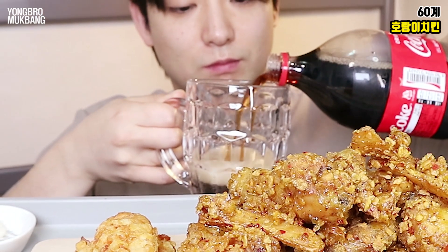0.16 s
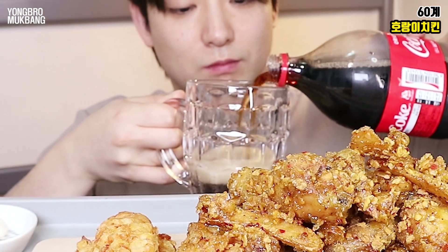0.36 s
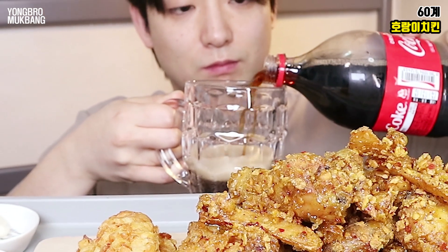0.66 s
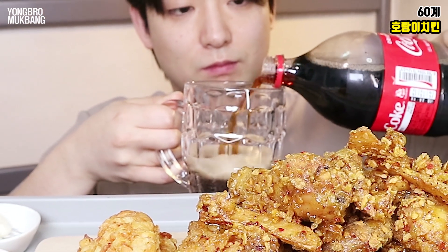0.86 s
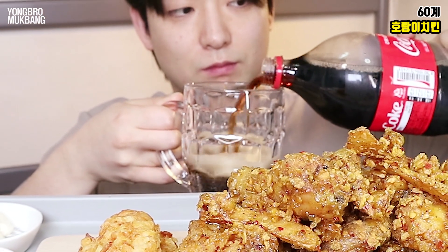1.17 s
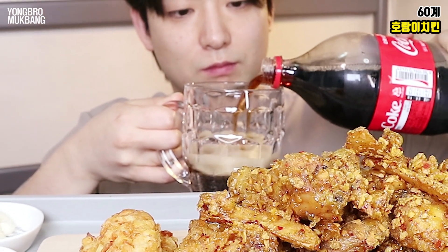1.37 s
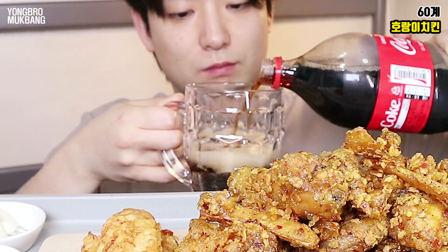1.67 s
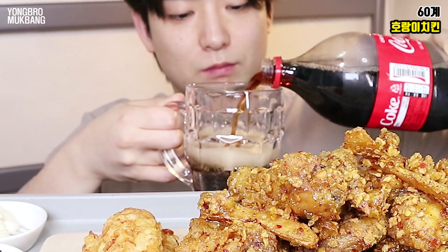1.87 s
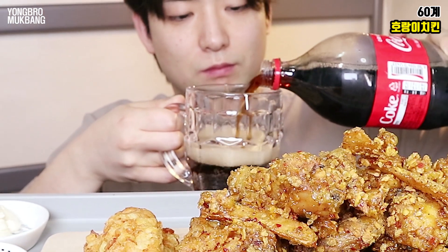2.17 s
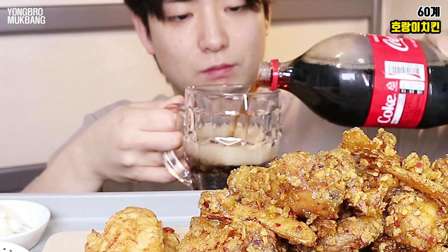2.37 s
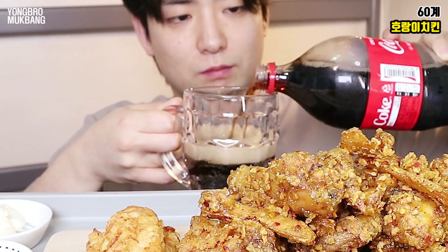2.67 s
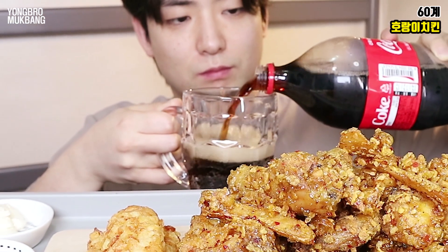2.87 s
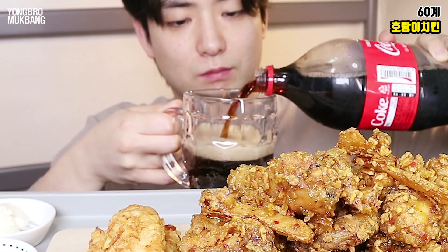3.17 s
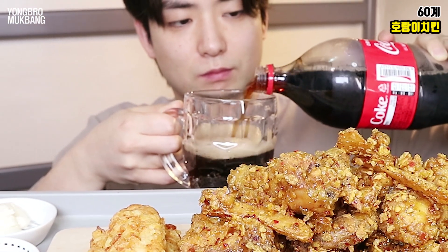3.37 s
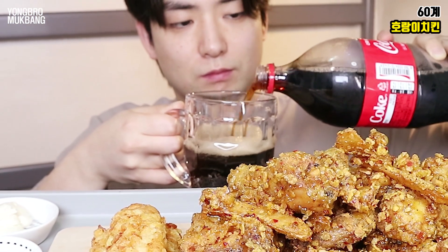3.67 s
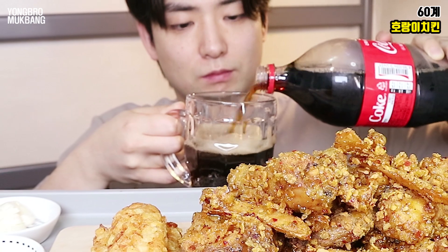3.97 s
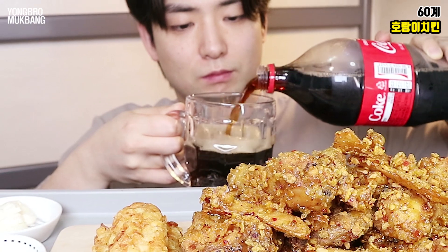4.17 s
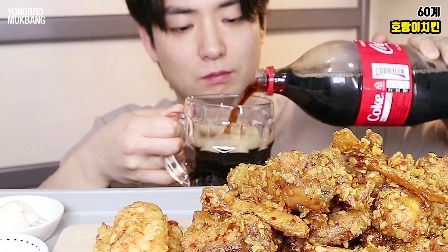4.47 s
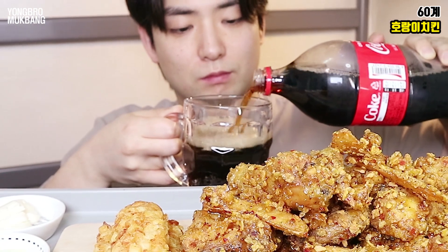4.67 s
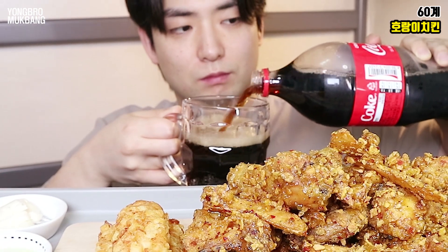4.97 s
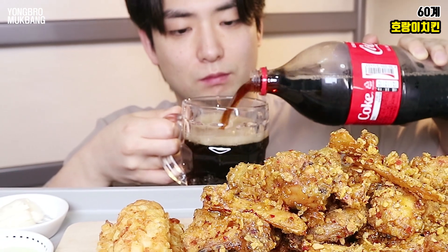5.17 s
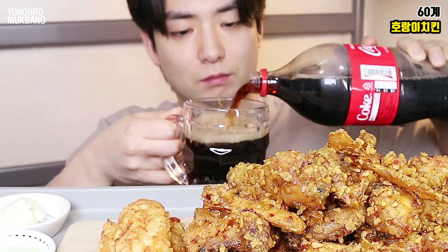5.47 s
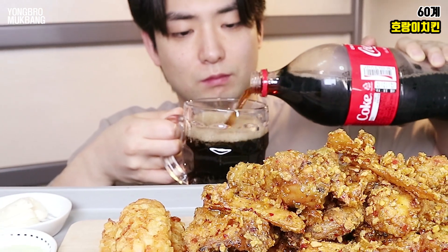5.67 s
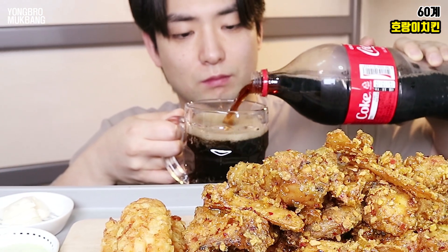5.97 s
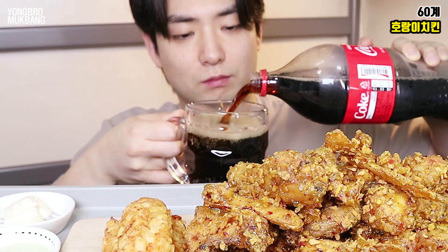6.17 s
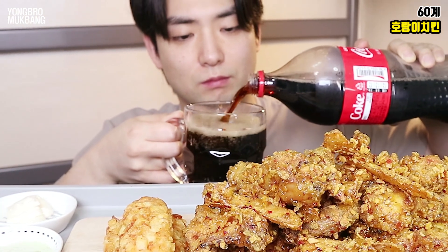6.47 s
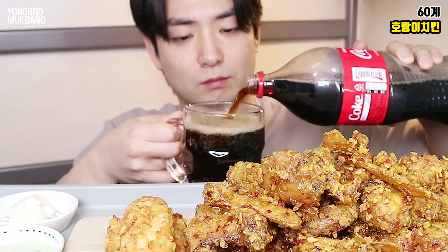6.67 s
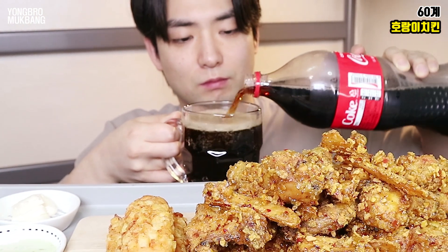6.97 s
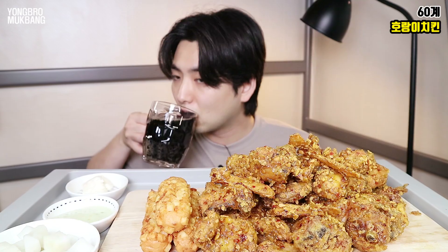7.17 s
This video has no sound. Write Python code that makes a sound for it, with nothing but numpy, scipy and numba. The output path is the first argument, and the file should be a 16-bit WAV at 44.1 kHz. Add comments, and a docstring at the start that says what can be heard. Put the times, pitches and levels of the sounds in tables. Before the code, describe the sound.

A fizzy drink gurgles from a plastic bottle into a glass mug, hollow note rising and thinning as it fills, then stops abruptly with soft knocks.

```python
"""A gurgling pour, close to the microphone: cola runs from a plastic bottle into a glass mug in a small room.
The stream beats bubbles into the drink; they ring the air in the mug, whose note climbs overall as it fills.
Random clicks through resonances make the gurgle, the surface patter and the fizz of the foam.
Damped tones make the single bubbles, the bottle's gulps of air and a few soft knocks of handling, most of
them around the moment the pour breaks off. Filtered noise and a faint hum lie behind it all."""
import sys
import numpy as np
from scipy import signal
from scipy.fft import rfft, irfft
from scipy.io import wavfile
from scipy.ndimage import uniform_filter1d
from numba import njit

SR = 44100
rng = np.random.default_rng(int(sys.argv[2]) if len(sys.argv) > 2 else 0)


def log_audio(samples):
    """Write samples as a 16-bit WAV file to the path given in sys.argv[1]."""
    # one column per channel
    frames = np.atleast_2d(samples).T
    # limit to full scale, then quantise
    limited = np.clip(frames, -1, 1)
    pcm = np.round(limited * 32767).astype(np.int16)
    wavfile.write(sys.argv[1], SR, pcm)


N = 323253
TIME = np.arange(N) / SR
POUR_END_S = 7.175
# fixed low resonances of the mug and its surroundings: pitch_hz, width_hz, lift_db
MUG_MODES = [(690, 60, -3), (810, 80, 3), (970, 70, 7), (1085, 70, -4), (1185, 90, 5), (1460, 130, -4),
             (1610, 50, 5), (1715, 50, 4), (2230, 110, 5), (2500, 250, -5)]


def amp(db):
    """Decibels to gain."""
    return 10 ** (np.asarray(db) / 20)


def unit(x):
    """Scales to rms 1."""
    return x / np.sqrt(np.mean(x ** 2) + 1e-20)


def curve(rows, axis, t=TIME):
    """One column of a table of timed rows, joined by straight lines."""
    rows = np.asarray(rows)
    return np.interp(t, rows[:, 0], rows[:, axis])


def slope(points, hz):
    """A spectrum in dB, joined on a log-frequency axis."""
    f, db = np.transpose(points)
    return np.interp(np.log(hz + 1), np.log(f + 1), db)


def lifts(modes, hz):
    """The dB that a set of resonances adds at each frequency."""
    return sum(db / (1 + (2 * (hz - f) / width) ** 2) for f, width, db in modes)


def add(mix, s, sound):
    """Mixes a sound in at time s."""
    part = mix[max(round(s * SR), 0):][:len(sound)]
    part += sound[:len(part)]


def colour(x, db_at, size=4096):
    """Causal (minimum-phase) filter whose gain in dB is db_at(Hz): it rings only after each click."""
    cepstrum = irfft(np.log(amp(db_at(np.fft.rfftfreq(size, 1 / SR)))))
    # folding the cepstrum forward in time moves all the ringing behind the click
    cepstrum[1:size // 2] *= 2
    cepstrum[size // 2 + 1:] = 0
    response = irfft(np.exp(rfft(cepstrum)))
    return signal.oaconvolve(x, response)[:N]


def steady(x, band, size=4000):
    """Holds the running rms inside a band (Hz) near 1, so that a level curve can play it."""
    bandpass = signal.butter(3, band, "bandpass", fs=SR, output="sos")
    inside = signal.sosfiltfilt(bandpass, x)
    power = uniform_filter1d(uniform_filter1d(inside ** 2, size), size // 2)
    return x / np.sqrt(abs(power) + 1e-20)


def pops(per_s, spread_db, clump_db, size=500):
    """Random clicks of unequal size, whose strength also wanders slowly so that they clump."""
    sizes = amp(spread_db * np.minimum(rng.exponential(1, N), 5)) * rng.choice([-1, 1], N)
    clumps = amp(clump_db * unit(uniform_filter1d(rng.standard_normal(N), size)))
    return unit(sizes * clumps * (rng.random(N) < per_s / SR))


@njit
def smooth(x, r):
    """One-pole low-pass with a moving pole."""
    y = np.zeros_like(x)
    for i in range(1, len(x)):
        y[i] = r[i] * y[i - 1] + (1 - r[i]) * x[i]
    return y


def resonate(x, hz, width):
    """A resonance of gain 1 that follows the curve hz: shift it to zero, low-pass, shift it back."""
    turn = np.exp(2j * np.pi * np.cumsum(hz) / SR)
    pole = np.exp(-np.pi * width / SR)
    return 2 * (turn * smooth(x / turn, pole)).real


def ring(db, hz, decay, rise=0., size=6000):
    """A damped tone that swells over one decay time (s); its pitch may creep up by the share rise per decay."""
    t = np.arange(size) / SR
    age = t / max(decay, 1e-4)
    tone = np.sin(2 * np.pi * hz * t * (1 + rise * np.minimum(age, 10) / 2))
    return amp(db) * age * np.exp(1 - age) * tone


def echoing(clicks, share, decay, count, size=1500):
    """Echoes between the glass walls; their pattern keeps changing as the surface heaves."""
    out, step = np.zeros(N), N // count + 1
    window = np.sin(np.pi * np.arange(2 * step) / (2 * step))
    padded = np.pad(clicks, (step, 3 * step))
    for k in range(count + 2):
        echoes = rng.standard_normal(size) * np.exp(-np.arange(size) / SR / decay)
        echoes *= share / np.linalg.norm(echoes)
        echoes[0] += 1  # the direct sound
        part = signal.fftconvolve(padded[k * step:][:2 * step] * window, echoes)
        add(out, max(k - 1, 0) * step / SR, part[step:] if k == 0 else part)
    return out


def in_mug(clicks, spectrum, patch_db, wander=0.014, rim_db=13.0, size=1024):
    """Clicks ring the high air modes of the filling mug, which shift as the drink rises."""
    # higher air modes: nearly_empty_hz, nearly_full_hz, width_hz, nearly_empty_lift_db, nearly_full_lift_db
    air_modes = [(1550, 1450, 820, -4.5, 3.5), (2380, 2234, 250, 8.5, 8.5), (2737, 2625, 164, 14.5, 12.5),
                 (3130, 2800, 140, -0.5, 8.5), (3141, 3141, 92, 9, 10.5), (5530, 5270, 470, 2.5, 12),
                 (6520, 6190, 330, -3.5, 6), (7240, 7010, 410, 6, 6.5), (7540, 7900, 230, -0.5, 7.5),
                 (7730, 7600, 220, 5, 2), (8370, 8480, 350, 6.5, 10), (9250, 9380, 380, -1.5, 6),
                 (10220, 10050, 400, 8.5, 6), (10700, 10550, 230, 2, 2), (11360, 11080, 350, 10.5, 6),
                 (13100, 12900, 390, 1, 6)]
    hz, t, z = signal.stft(clicks, SR, nperseg=size, noverlap=size * 3 // 4)
    hz = hz[:, None]
    fill = np.clip((t - 1.4) / 3.7, 0, 1)
    # the heaving foam detunes each mode a little
    heave = rng.standard_normal((len(air_modes), len(t)))
    heave = 1 + wander * unit(uniform_filter1d(heave, size=36, axis=1))
    modes = [((f0 + (f1 - f0) * fill) * drift, width, db0 + (db1 - db0) * fill)
             for (f0, f1, width, db0, db1), drift in zip(air_modes, heave)]
    # close to the rim the shallow air gap brightens the splash
    modes.append((2950, 600, rim_db * np.clip((t - 5.6) / 1.6, 0, 1)))
    # the wandering stream favours now one mode, now another
    patches = uniform_filter1d(rng.standard_normal(z.shape), size=5, axis=0)
    patches = unit(uniform_filter1d(patches, size=16, axis=1))
    z = z * amp(slope(spectrum, hz) + lifts(modes, hz) + patch_db * patches)
    return signal.istft(z, nperseg=size, noverlap=size * 3 // 4)[1][:N]


def filled():
    """How full the mug is, 0 to 1."""
    return np.clip(TIME / POUR_END_S, 0, 1)


def building(build_s=0.91, build_db=4.5):
    """The dB (0 or below) by which the stream is still short of its full strength."""
    return -build_db * np.clip(1 - TIME / build_s, 0, 1)


def swell(start, length, peak=0.21):
    """0 to 1 and back: a quick rise to the share peak of the length, then a slower ebb."""
    return np.sin(np.pi / 2 * np.interp((TIME - start) / length, [0, peak, 1], [0, 1, 0]))


def surging():
    """The dB that the gurgle gains where the stream surges and plunges deeper."""
    # surges of the stream: start_s, length_s, gurgle_lift_db
    surges = [(2.66, 0.14, 1.5), (2.922, 0.1, 2.5), (3.882, 0.32, 3.5), (4.57, 0.19, 4.5),
              (4.948, 0.17, 10.5), (5.313, 0.089, 3), (5.464, 0.073, 4), (5.72, 0.13, 4.5),
              (6.24, 0.13, 7.5), (6.335, 0.16, 8.5)]
    return sum(db * swell(start, length) for start, length, db in surges)


def room(level_db=-53):
    """Ventilation as coloured noise, and an appliance's faint hum as steady sines."""
    # relative spectrum of the ventilation: pitch_hz, level_db
    air_tone = [(25, -35), (60, -31), (100, -13), (160, -10), (220, 4.5), (300, 0), (400, 2.5), (500, -3.5),
                (750, -5), (1400, -17), (2200, -15), (4000, -20), (9000, -22), (15700, -32)]
    # appliance hum: pitch_hz, rms_level_db
    hum_tones = [(67.2, -76.5), (341, -63), (568, -67.5)]
    air = unit(colour(rng.standard_normal(N), lambda hz: slope(air_tone, hz)))
    hum = sum(amp(db) * np.sqrt(2) * np.sin(2 * np.pi * (hz * TIME + rng.random()))
              for hz, db in hum_tones)
    return amp(level_db) * air + hum


def knocks(rub_decay=0.05, size=5000):
    """Handling: dull blows as short damped tones, each with a brief rub of fading noise."""
    # soft knocks: start_s, peak_db, pitch_hz, decay_s, rub_level_db (before the rub's tone filter)
    blow_list = [(0.577, -37, 425.4, 0.0036, -74), (3.29, -39, 281, 0.0024, -49),
                 (7.14, -40, 247, 0.0023, -56), (7.222, -47, 416, .003, -52),
                 (7.254, -36.5, 760, 0.0019, -59), (7.279, -40, 605, 0.0015, -47),
                 (7.299, -31.5, 368, 0.0024, -60)]
    blows, rubs = np.zeros(N), np.zeros(N)
    for s, db, hz, decay, rub_db in blow_list:
        add(blows, s, ring(db, hz, decay))
        fading = np.exp(-np.arange(size) / SR / rub_decay)
        add(rubs, s, amp(rub_db) * rng.standard_normal(size) * fading)
    # tone filter of the rubs: pitch_hz, gain_db
    tone = [(80, -3), (300, 16.5), (900, 15.5), (1600, 9), (2100, -9), (2900, 8.5), (4000, -10),
            (7000, -6), (15000, -14)]
    return blows + colour(rubs, lambda hz: slope(tone, hz))


def gulps(level_db=-1.0, decay=0.0064, rise=.012):
    """Air slips back through the neck and thumps softly; the pitch sinks as the bottle's air space grows."""
    # gulps of the bottle: start_s, peak_db (before the common level_db)
    gulp_list = [(0.12, -46), (0.439, -44), (0.791, -39.5), (1.096, -44), (1.126, -47), (1.462, -43),
                 (1.881, -37), (2.072, -52), (2.268, -47), (3.836, -51), (4.212, -48), (4.549, -50),
                 (5.253, -53), (5.914, -48)]
    first_hz, last_hz, settle_s = 224, 167, 2.4
    out = np.zeros(N)
    for s, db in gulp_list:
        hz = last_hz + (first_hz - last_hz) * np.exp(-s / settle_s)
        add(out, s, ring(db + level_db, hz, decay, rise))
    return out


def fizz(surge_share=0.052):
    """Thousands of tiny foam bubbles burst each second; the foam follows a share of the surges' dB."""
    # relative spectrum of the fizz, before the air modes: pitch_hz, level_db_per_hz
    fizz_tone = [(1000, -44), (3500, -20.5), (4850, -17.5), (5700, -11), (6300, -0.5), (7100, -0.5),
                 (8000, -9), (9000, -12), (11000, -14), (12500, -20.5), (15700, -42)]
    # level of the fizzing foam head, before the surges: time_s, level_db
    foam_level = [(0, -60), (0.45, -52.5), (0.7, -52), (1.2, -48), (1.5, -50.5), (2.0, -49.5), (2.7, -51),
                  (3.1, -52.5), (3.4, -57), (3.65, -52), (3.83, -51), (4.05, -51), (4.13, -53.5),
                  (5.0, -51), (5.85, -50.5), (6.05, -49.5), (7.16, -48.6)]
    drive = echoing(pops(per_s=5000, spread_db=3.0, clump_db=-0.5), share=1.0, decay=0.0043, count=90)
    foam = in_mug(drive, fizz_tone, patch_db=2.0)
    return steady(foam, (5000, 12000)) * amp(curve(foam_level, axis=1) + surge_share * surging())


def splash(level_db=-58, growth_db=9.5, growth_power=3.6, surge_share=0.15, flurry_width_hz=320):
    """Smaller bubbles patter at the surface, above the note of the air column; the patter grows as the drink
    rises, and now and then a flurry of small bubbles sets one air mode singing."""
    # relative spectrum of the patter, before the air modes: pitch_hz, level_db_per_hz
    splash_tone = [(60, -19), (450, -27), (620, 0), (1200, 3), (1450, -1), (1750, 4.5), (2100, 2.5),
                   (2500, -5), (2850, -9.5), (3500, -10.5), (4300, -21.5), (8000, -16)]
    # flurries of small bubbles: start_s, length_s, lift_db, mode_hz
    flurries = [(0.36, 0.25, 10, 2650), (0.8, 0.7, 5, 2650), (3.037, 0.38, 5, 2700), (3.62, 0.3, 6.5, 1900),
                (3.977, 0.13, 10, 2700), (4.158, 0.17, 7.5, 2220), (4.68, 0.31, 7.5, 2050),
                (5.03, 0.12, 11, 1900), (5.307, 0.13, 7, 2740), (5.738, 0.062, 8.5, 2200),
                (5.92, 0.26, 6.5, 2680), (6.23, 0.14, 10, 1660), (6.34, 0.16, 5.5, 2230),
                (6.554, 0.33, 5, 1730)]
    drive = echoing(pops(per_s=2200, spread_db=0.5, clump_db=1.37), share=0.42, decay=0.0081, count=45)
    patter = steady(in_mug(drive, splash_tone, patch_db=2.5), (2150, 3300))
    singing = np.zeros(len(patter))
    for start, length, db, hz in flurries:
        mode = signal.lfilter(*signal.iirpeak(hz, hz / flurry_width_hz, SR), patter)
        singing += (amp(db * swell(start, length)) - 1) * mode
    growth = growth_db * filled() ** growth_power
    return (patter + singing) * amp(level_db + growth + building() + surge_share * surging())


def bubbles(level_db=-5.0, decay=0.0026, rise=0.0019, mug_share=0.53):
    """Single large bubbles plop out of the gurgle as damped tones and leave the mug ringing briefly."""
    # large bubbles bursting into the mug: start_s, peak_db (before level_db, echoes and mug), pitch_hz
    bubble_list = [(0.356, -21, 890), (0.394, -32, 957), (0.533, -27, 956), (0.578, -19.5, 920),
                   (0.931, -23, 954), (1.075, -23, 964), (1.17, -21.5, 910), (1.205, -26, 917),
                   (1.397, -25.5, 854), (1.463, -21, 875), (1.499, -20, 945), (1.584, -22.5, 973),
                   (1.914, -25.5, 950), (2.149, -25.5, 936), (2.176, -21, 870), (2.245, -23, 980),
                   (2.672, -26.5, 970), (2.685, -17.5, 920), (2.939, -21, 942), (3.149, -24.5, 950),
                   (3.291, -23.5, 955), (3.662, -37, 2050), (3.722, -27, 1160), (4.339, -18.5, 953),
                   (4.959, -18, 985), (5.0, -23, 1166), (5.046, -28, 1130), (5.047, -28, 1920),
                   (5.059, -23, 1720), (5.061, -33.5, 2220), (5.074, -30, 1790), (5.139, -31, 1710),
                   (5.767, -30, 1170), (6.263, -27, 1163), (6.265, -29.5, 1690), (6.283, -34, 1163),
                   (6.356, -33.5, 1636), (6.402, -26, 1620), (6.405, -29, 2220), (6.655, -37.5, 1730),
                   (6.739, -29, 1830), (6.907, -39, 1625)]
    out = np.zeros(N)
    for s, db, hz in bubble_list:
        add(out, s, ring(db + level_db, hz, decay, rise))
    plops = echoing(out, share=0.23, decay=0.017, count=40)
    return colour(plops, lambda hz: mug_share * lifts(MUG_MODES, hz))


def gurgle(level_db=-32, fade_db=23, fade_power=1.73, skirt=0.072):
    """Bubbles under the stream drive the air column, which shortens as the drink rises; the stream's fall
    shortens too, so the gurgle fades."""
    # resonance of the air above the drink: time_s, note_hz, width_hz
    air_column = [(0, 878, 190), (1.4, 903, 200), (2.6, 905, 192), (3.5, 994, 230), (4.5, 1050, 224),
                  (5.2, 1194, 344), (5.8, 1204, 425), (6.31, 1200, 342), (6.35, 1650, 240),
                  (6.7, 1740, 330), (7.2, 1620, 420)]
    note, width = curve(air_column, axis=1), curve(air_column, axis=2)
    drive = echoing(pops(per_s=1900, spread_db=2.5, clump_db=0.06), share=0.54, decay=0.0061, count=50)
    # two passes sharpen the note; a little of the single pass keeps a wider skirt around it
    once = resonate(drive, note, width)
    twice = resonate(once, note, width)
    air = colour(twice + skirt * once, lambda hz: lifts(MUG_MODES, hz))
    fade = fade_db * np.sin(np.pi / 2 * filled() ** fade_power) ** 2
    return steady(air, (700, 2000)) * amp(level_db - fade + building() + surging())


def scene():
    """Everything sits in the centre; only a trace of low air and hiss differs between the ears."""
    pouring = np.clip((POUR_END_S - TIME) / .002, 0, 1)  # the stream stops within 2 ms
    stream = pouring * (gurgle() + splash() + fizz())
    mid = stream + bubbles() + gulps() + knocks() + room()
    # relative spectrum of the difference between the ears: pitch_hz, level_db
    width = [(30, -6), (230, 16.0), (600, 15.5), (1500, -26.0), (4000, -12.0), (7000, -23),
             (12000, 1.5), (15500, 6.5)]
    side = amp(-70) * unit(colour(rng.standard_normal(N), lambda hz: slope(width, hz)))
    return np.array([mid + side, mid - side])


def record(dry, edge_hz=15760):
    """A steep low-pass limits the band."""
    taps = signal.firwin(1023, edge_hz, window=("kaiser", 9), fs=SR)
    return signal.oaconvolve(dry, taps[None], "same")


dry = scene()
out = record(dry)
log_audio(out)
```